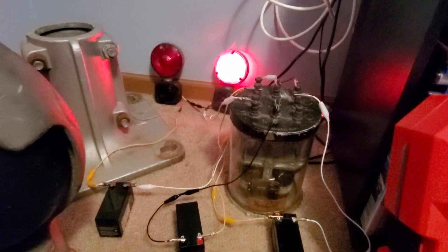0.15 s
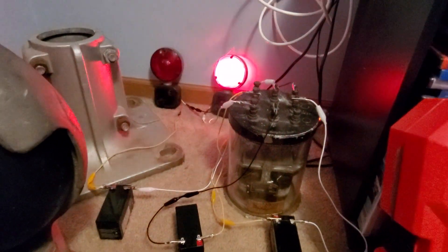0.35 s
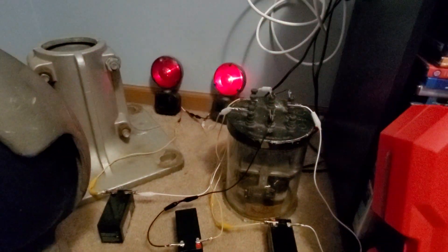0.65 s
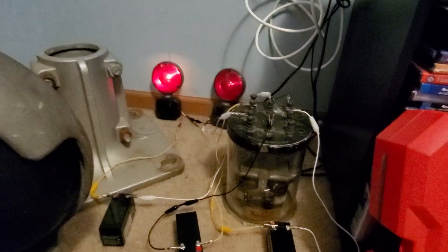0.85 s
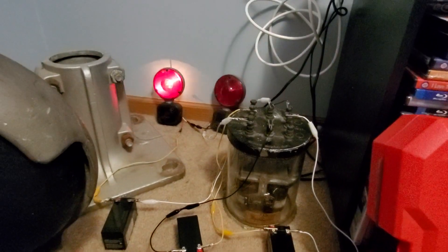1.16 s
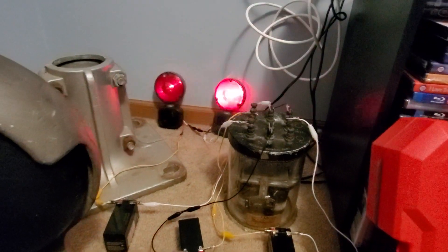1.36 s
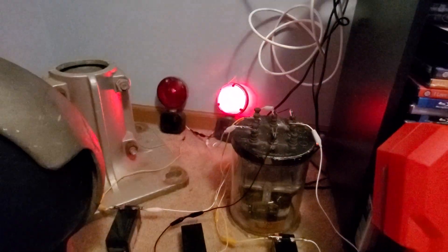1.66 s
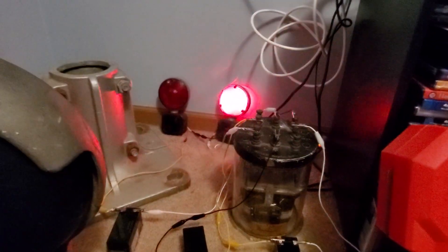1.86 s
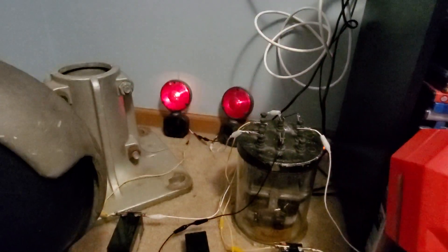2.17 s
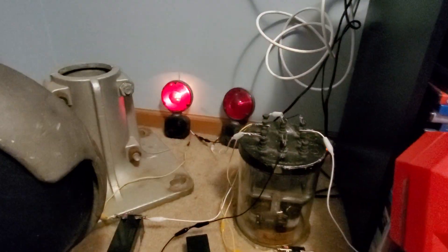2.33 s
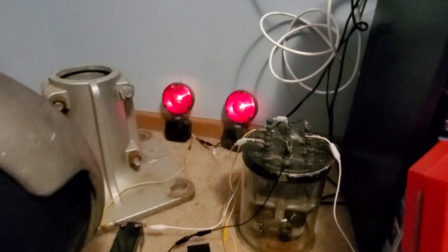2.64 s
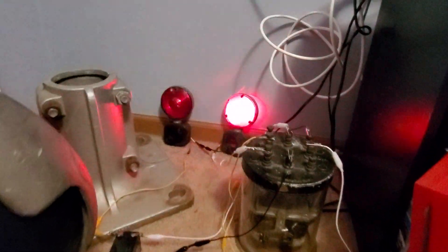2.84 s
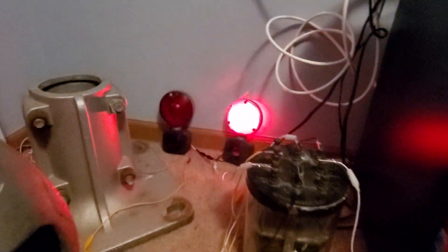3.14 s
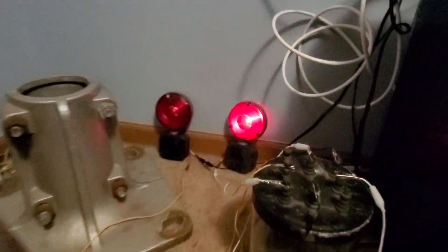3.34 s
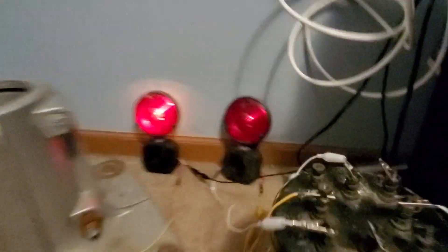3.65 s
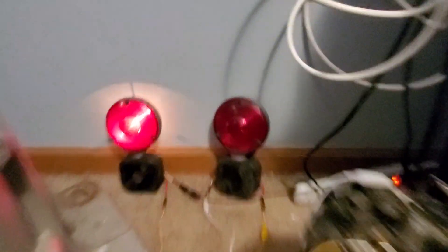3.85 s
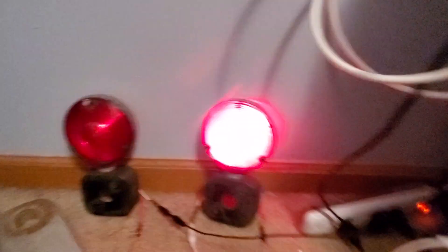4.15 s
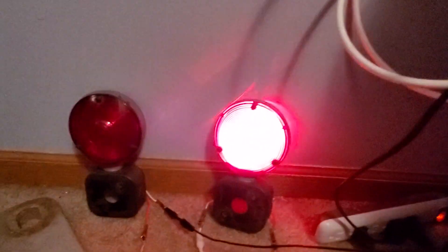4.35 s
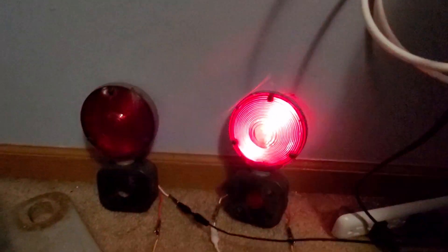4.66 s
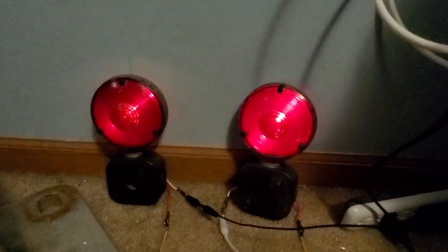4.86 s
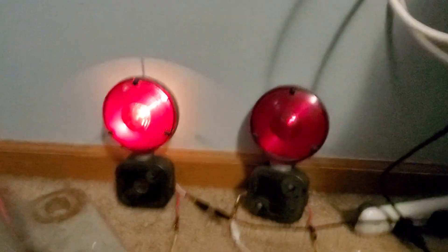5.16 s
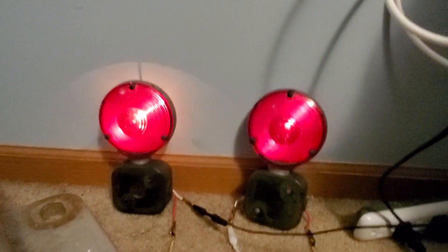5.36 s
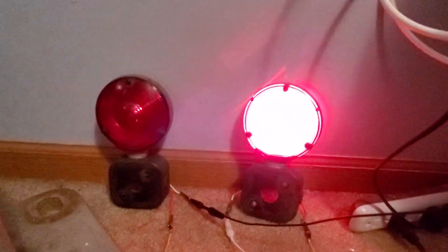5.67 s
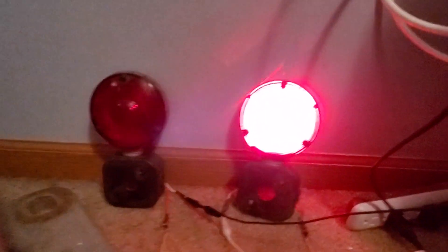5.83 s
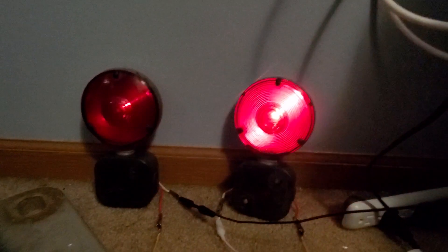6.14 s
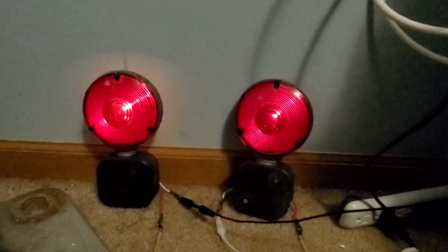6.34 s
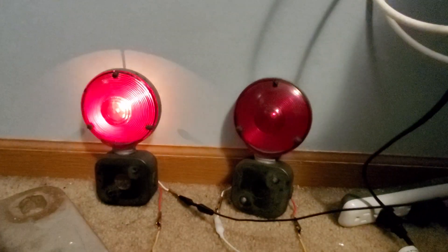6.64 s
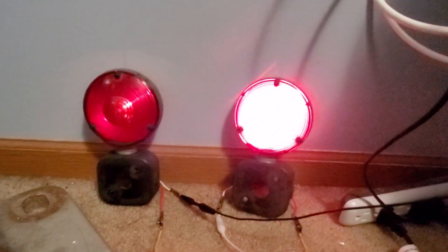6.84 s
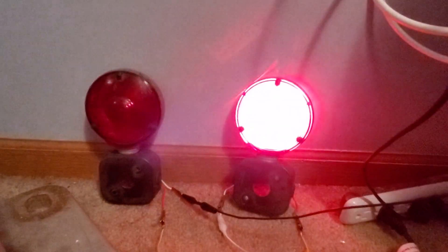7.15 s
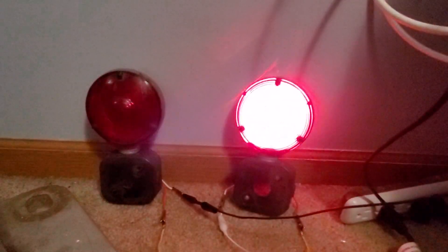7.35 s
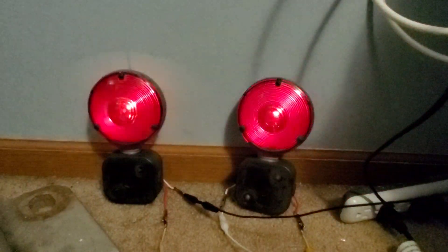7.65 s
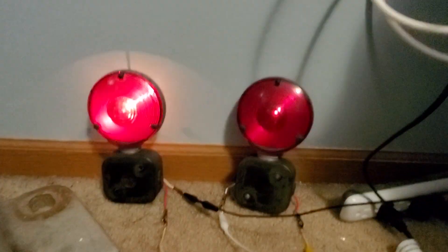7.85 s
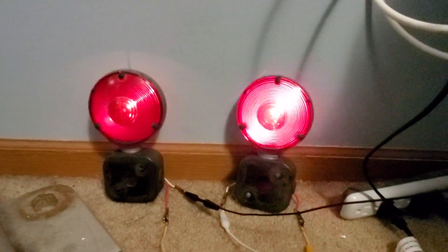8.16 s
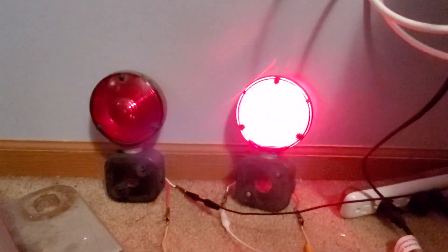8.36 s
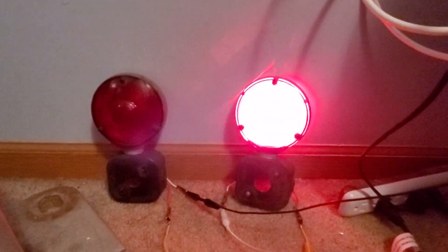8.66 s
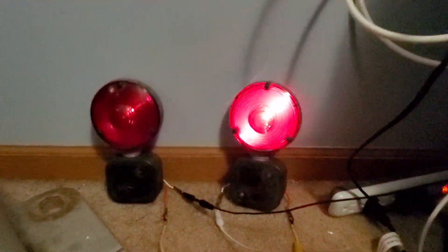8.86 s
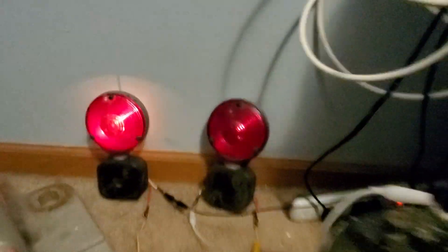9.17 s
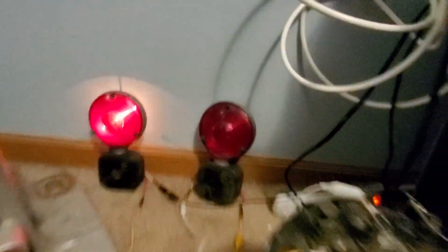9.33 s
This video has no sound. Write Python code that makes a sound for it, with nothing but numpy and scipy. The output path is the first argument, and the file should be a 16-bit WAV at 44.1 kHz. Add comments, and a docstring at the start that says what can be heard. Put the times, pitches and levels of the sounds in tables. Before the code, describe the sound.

An old relay clacks steadily to and fro in a small room, growing louder and drier as the hand-held microphone moves close, with cloth rustles and bumps.

```python
"""An old flasher relay in a glass case rocks to and fro on the carpet of a small room, switching two lamps.
Each armature throw is a resonant crack with one rebound, noise clatter shaped by the case, and room decay.
The hand-held microphone moves up close and draws back: throws change colour and turn drier.
Bumps on its housing are short noise bursts through resonances; sliding clothes are enveloped coloured noise.
Underneath lie a low noise rumble and a wavering sine hum."""
import sys
import numpy as np
from scipy import signal
from scipy.fft import rfft, irfft
from scipy.io import wavfile
from scipy.ndimage import uniform_filter1d

SR = 44100
rng = np.random.default_rng(int(sys.argv[2]) if len(sys.argv) > 2 else 0)


def inscribe(sig):
    """Save sig as 16-bit PCM at rate SR to the path in sys.argv[1].

    A 1-D sig is mono; a 2-D sig holds one channel per row.
    Samples are clipped to [-1, 1] before scaling.
    """
    pcm = np.round(np.clip(np.atleast_2d(sig).T, -1, 1) * 32767)
    wavfile.write(sys.argv[1], SR, pcm.astype(np.int16))


N = 418950
SIZE = 16384  # samples in one struck sound
T = np.arange(N) / SR
AGE = np.arange(SIZE) / SR
HZ = np.maximum(np.arange(SIZE // 2 + 1) * SR / SIZE, 1)
ALL_HZ = np.maximum(np.arange(N // 2 + 1) * SR / N, 1)


def relay(change=.5):
    """The armature rocks between two stops; each side repeats its own clatter with small changes."""
    # armature throws, sides 0 and 1 in turn: t/s, relative level/dB
    throws = [(.5153, -1.9), (1.2343, -1.5), (1.8835, -2.5), (2.6073, -1.6), (3.2608, -2.1), (3.9815, -2.5),
              (4.6338, 0.1), (5.354, -1.7), (6.0044, -1), (6.7228, -1.5), (7.373, -1.35), (8.0955, -1.5),
              (8.7446, 0.3), (9.466, -3.5)]
    # microphone path: t/s, closeness/0-1
    closeness = [(0, 0.15), (2.6, 0.11), (4.0, 0.4), (4.6, 0.89), (8.1, .95), (9.5, 0.63)]
    # colour of a throw: f/Hz, side 0/dB, side 1/dB, added up close/dB
    throw_colour = [(165, 3, 0.5, 5.5), (300, 1.5, 2.5, 3), (1296, -1, -2, 0), (2050, 0.5, -0.5, 0.5),
                    (6000, 0.02, -0.1, 1)]
    out = np.zeros((2, N))
    habit = rng.standard_normal((2, 3, 2, SIZE))
    tint = np.transpose(throw_colour)
    for k, (start_s, level_db) in enumerate(throws):
        side = k % 2
        near = np.clip(np.interp(start_s, *np.transpose(closeness)), 0, 1)
        chance = habit[side] + change * rng.standard_normal((3, 2, SIZE))
        colour_db = along(HZ, tint[0], tint[1 + side] + near * tint[3])
        sound = irfft(click(side, near, chance) * struck(undb(colour_db)))
        add(out, start_s, undb(level_db) * sound)
    return out


def click(side, near, chance, low_cut_hz=210, room_split_hz=2500, port_lag_s=14 / SR):
    """Spectrum of one throw at both ports: crack, rebound, clatter, room and springs."""
    # frame, contacts and glass case: f/Hz, width/Hz,
    # side 0 afar/dB, side 1 afar/dB, side 0 close/dB, side 1 close/dB
    case_modes = [(233, 22, 6, 8, 20, 30), (294, 32, 14, 24, 18, 14), (329, 22, 20, 15, 22, 27),
                  (356, 26, 23, 21, 18, 18), (420, 60, 7, 7, 17, 20), (483, 37, -1, 9, 18, 25),
                  (531, 31, 17, -1, 26, 14), (582, 40, 19, 19, 10, 24), (682, 18, 24, 19, 25, 23),
                  (832, 67, 18, 14, 13, 23), (930, 58, 23, 24, 27, 28), (1063, 54, 18, 16, 32, 31),
                  (1206, 74, 23, 10, 31, 19), (1331, 57, 20, 7, 33, 9), (1438, 74, 15, 11, 31, 24),
                  (1750, 103, 24, 21, 23, 23), (2036, 72, 10, 11, 18, 23), (2356, 159, 9, 18, 18, 22),
                  (2774, 172, 11, 5, 15, 16), (3631, 135, 11, 11, 15, 19), (4088, 149, 9, 6, 10, 11),
                  (4323, 287, 8, 2, 18, 4), (5074, 168, 3, -5, 4, 4), (5951, 208, 10, -5, 24, 18),
                  (6090, 118, 13, 15, 18, 21), (6534, 294, 6, 5, 14, 14), (7568, 393, 0, 3, 0, 12),
                  (8151, 406, 5, 2, 10, 12), (10531, 671, -2, -1, 2, 6), (12704, 868, -5, -11, 3, 3),
                  (14499, 716, -13, -5, -3, 4)]
    # first crack on the stop: f/Hz, width/Hz, side 0/dB, side 1/dB
    crack_modes = [(720, 900, 10, 14), (1260, 330, 30, 20), (2150, 900, 14, 15), (4350, 1300, 12, 5),
                   (6020, 750, 21, 14), (9100, 12000, -2, -5)]
    # microphone ports: f/Hz, left minus right afar/dB, close/dB, likeness afar/-1..1, close/-1..1
    port_table = [(235, -1, 0, .9, .5), (560, 2, -3.5, .8, .1), (1160, 2, -1, .35, -.65),
                  (2250, 5, .5, 0, .1), (4550, -4, -7, .2, .2), (11100, -3, -4.5, 0, 0)]
    # contact springs that ring on faintly: f/Hz, t60/s, relative level/dB
    spring_modes = [(682, .2, -56), (1310, .5, -66), (6090, .22, -55), (8125, .24, -55), (10400, .5, -71)]
    bounce_s, bounce_db = (0.013, 0.012)[side], -9.5  # re first crack

    def mix(far, close):
        """Value at the present closeness."""
        return far + near * (close - far)

    modes, stop, ports = np.transpose(case_modes), np.transpose(crack_modes), np.transpose(port_table)
    pan = sides(along(HZ, ports[0], mix(ports[1], ports[2])))
    likeness = along(HZ, ports[0], mix(ports[3], ports[4]))

    # the small case cannot radiate deep bass
    radiation = 1 / np.sqrt(1 + (low_cut_hz / HZ) ** 12)
    case = body(modes[0], modes[1], mix(modes[2 + side], modes[4 + side])) * radiation

    # contact chatter
    clatter_t60_s = mix(0.13, [.055, .06][side])
    clatter_rise_s = mix(0.0015, [.0003, .001][side])
    clatter_db = mix(-0.56, [-3, -.8][side])
    clatter = scatter(chance[0], clatter_t60_s, clatter_rise_s) * undb(clatter_db)

    # the room holds lows longer than treble
    dull = 1 / np.sqrt(1 + (HZ / room_split_hz) ** 4)
    room_lows = dull * scatter(chance[1], 0.24, 0.0071)
    room_highs = np.sqrt(1 - dull ** 2) * scatter(chance[2], 0.22, 0.012)
    room = undb(mix(-5.0, [-14, -11.5][side])) * (room_lows + room_highs)
    diffuse = pair(clatter + room, likeness) * struck(case * pan)

    # direct crack; up close it reaches the right port first
    lag_s = np.array([[port_lag_s * near], [0]])
    crack = struck(body(stop[0], stop[1], stop[2 + side], order=2) * radiation * pan)
    crack = crack * np.exp(-2j * np.pi * HZ * lag_s)
    crack = crack * (1 + undb(bounce_db) * np.exp(-2j * np.pi * HZ * bounce_s))

    springs = np.zeros((2, SIZE))
    for f_hz, t60_s, level_db in spring_modes:
        phase = rng.random((2, 1))
        springs += undb(level_db - 60 * AGE / t60_s) * np.sin(2 * np.pi * (f_hz * AGE + phase))
    return diffuse + undb(mix(-14, -0.66)) * crack + undb(mix(1.5, 0)) * rfft(springs)


def handling():
    """Fingers bump the housing: dry ticks and knocks reach the ports through its resonances."""
    # bumps: t/s, thud/dB, knock/dB, tick/dB, t60/s, left minus right/dB
    bumps = [(3.096, 1, -8, -27, 0.015, -11), (3.4123, -15, -6.5, 15, 0.0012, -27),
             (3.6261, 2, -6, -19, 0.17, -3), (3.6445, 7.5, 0, -7, 0.039, -6),
             (3.6898, -12, -20, -39, 0.049, -6), (4.3027, -14, -14.5, -32, .03, 2),
             (5.4748, -34.5, -35, -23, .01, -14), (6.2045, -5.5, -31, -52, 0.029, -12),
             (7.7658, -37.5, -29, -41, 0.0076, -18), (8.8478, 14, 2, -16, 0.0043, -10),
             (8.8645, -15, -12.5, -24, 0.0042, -11)]
    # housing resonances, a thud, two knocks and a tick: f/Hz, width/Hz
    housing_modes = [(170, 240), (650, 2100), (1650, 860), (13900, 2900)]
    out = np.zeros((2, N))
    for start_s, thud_db, knock_db, tick_db, t60_s, pan_db in bumps:
        contact = pair(scatter(rng.standard_normal((2, SIZE)), t60_s, 0.00013), 0.297)
        levels_db = [thud_db, knock_db, knock_db, tick_db]
        housing = body(*np.transpose(housing_modes), levels_db, order=1.7)
        add(out, start_s, sides(pan_db) * irfft(contact * struck(housing)))
    return out


def clothes():
    """Cloth slides as the arm moves: fine hiss, coarser brushing with catching folds, short scuffs."""
    # arm movements: start/s, length/s, relative fine hiss/dB, relative coarse brushing/dB
    moves = [(0, 0.41, -72.5, -66), (.9, 0.15, -71, -73), (1.17, .3, -64.5, -63), (1.73, 0.37, -76.5, -68),
             (2.92, 0.11, -67.5, -70), (3.13, 0.36, -69.5, -62), (4.0, 1.6, -58, -59.5),
             (5.45, .2, -75.5, -76.5), (8.88, .42, -62, -66.5), (9.38, .12, -90.5, -62.5)]
    # short scuffs: t/s, level/dB, length/s, centre f/Hz, width/Hz
    scuffs = [(0.338, -50.5, 0.029, 1630, 970), (0.887, -65, 0.039, 1500, 4320),
              (4.155, -54.5, 0.014, 1700, 1200), (4.301, -54.5, 0.037, 910, 1780),
              (5.239, -53, 0.04, 1710, 900)]
    hiss_sag_db_per_s, brush_sag_db_per_s = 8, 13.5
    catches_per_s, catch_db, catch_spread_db = 43, -9, 5.5  # catch level re brushing

    fine = sum(undb(db) * stroke(s, length, hiss_sag_db_per_s) for s, length, db, _ in moves)
    coarse = sum(undb(db) * stroke(s, length, brush_sag_db_per_s) for s, length, _, db in moves)
    hiss_db = along(ALL_HZ, [2090, 4530, 8900, 12200, 15800], [-31.5, -6.5, -8.0, -2.0, -6.0])
    hiss = noise(undb(hiss_db), 0.096)
    weave_db = along(ALL_HZ, [160, 460, 920, 2100, 4400, 8100], [-6.5, 6.5, -2.5, -0.1, -8.0, -15.0])
    weave = undb(weave_db)

    # folds catch and let go at random instants, common to both ports
    instants = rng.random(N) < catches_per_s / SR
    catches = instants * undb(catch_spread_db * rng.standard_normal((2, N)))
    catches = irfft(rfft(catches) * weave, N)
    brush = noise(weave, 0.75) + undb(catch_db) * catches / catches.std()
    out = shimmer(hiss * fine + brush * coarse, depth_db=4, rate_hz=14) * undb(1.0 * walk(25))

    for start_s, level_db, length_s, centre_hz, width_hz in scuffs:
        grain = pair(rfft(rng.standard_normal((2, SIZE))), 0.14)
        rub = irfft(grain * resonance(HZ, centre_hz, width_hz) ** 2)
        envelope = np.exp(-(AGE / length_s) ** 4)
        add(out, start_s, undb(level_db) * rub / rub.std() * envelope)
    return out


def stroke(start_s, length_s, sag_db_per_s, attack_s=0.059, release_s=0.055):
    """Envelope of one arm movement: swell, slow sag as the arm eases off, release."""
    early_s = np.maximum(start_s - T, 0)
    late_s = np.maximum(T - start_s - length_s, 0)
    sag_db = -sag_db_per_s * np.clip(T - start_s, 0, length_s)
    return np.exp(-(early_s / attack_s) ** 2 - late_s / release_s) * undb(sag_db)


def shimmer(x, depth_db, rate_hz, count=8):
    """The colour of a rustle shifts: each octave band flickers on its own."""
    octave = np.clip(np.log2(ALL_HZ / 125), 0, count - 1)
    spectrum = rfft(x)
    out = np.zeros((2, N))
    for k in range(count):
        band = irfft(spectrum * np.maximum(1 - abs(octave - k), 0), N)
        out += band * undb(depth_db * walk(rate_hz))
    return out


def room_tone(rumble_db=-54.0, hum_hz=185.6, hum_db=-62):
    """Low house rumble builds up and a wavering appliance hum fades as the microphone nears the wall."""
    # rumble spectrum: f/Hz, relative density/dB per Hz
    rumble_spectrum = [(21, -19.5), (41, -15), (58, -0.5), (76, -9.5), (96, -7.5), (126, -19.5), (162, -24),
                       (282, -28.5), (455, -36.5), (1010, -44), (2050, -46.5), (5050, -55.5), (8500, -64),
                       (12500, -55.5)]
    to_wall_s = (3.1, 3.6)
    hum_change_db, rumble_change_db = -10.5, 2  # at the wall
    wall = np.interp(T, to_wall_s, [0, 1])
    likeness = along(ALL_HZ, [150, 500, 1500], [.88, .6, .1])
    rumble = noise(undb(along(ALL_HZ, *np.transpose(rumble_spectrum))), likeness)
    hum_level_db = hum_db + hum_change_db * wall + 2.0 * walk(6.3)
    # sqrt(2): level counts as rms
    hum = np.sin(2 * np.pi * hum_hz * T + 0.28 * walk(5)) * np.sqrt(2) * undb(hum_level_db)
    return rumble * undb(rumble_db + rumble_change_db * wall + 0.18 * walk(2)) + hum


def undb(db):
    """Decibels to gain."""
    return 10 ** (np.asarray(db) / 20)


def along(hz, points, values):
    """Values joined by straight lines on a log-frequency axis."""
    return np.interp(np.log(hz), np.log(points), values)


def sides(pan_db):
    """Left and right gains of constant total power."""
    g = undb(np.array([[1], [-1]]) * pan_db / 2)
    return g / np.sqrt(np.mean(g ** 2, axis=0))


def resonance(hz, centre_hz, width_hz):
    """Gain of one resonance, 1 at its centre."""
    return 1 / np.sqrt(1 + ((hz ** 2 - centre_hz ** 2) / (hz * width_hz)) ** 2)


def body(centres_hz, widths_hz, levels_db, order=1):
    """Gain of a set of resonances summed in power; a higher order steepens their skirts."""
    power = 0
    for f_hz, width_hz, db in zip(centres_hz, widths_hz, levels_db):
        power = power + (undb(db) * resonance(HZ, f_hz, width_hz) ** order) ** 2
    return np.sqrt(power)


def struck(gain):
    """Minimum-phase response with this gain: sharp start, ringing after."""
    cepstrum = irfft(np.log(gain + 1e-7))
    # fold onto positive time
    cepstrum[..., 1:SIZE // 2] *= 2
    cepstrum[..., SIZE // 2 + 1:] = 0
    return np.exp(rfft(cepstrum))


def scatter(grains, t60_s, rise_s, count=3):
    """Spectrum of dense, nearly colourless impacts or echoes that swell and die away; unit energy."""
    fade = undb(-60 * AGE / t60_s) * (1 - np.exp(-(AGE + 1 / SR) / rise_s))
    x = grains * fade
    # alternately flatten the spectrum and restore the envelope
    for _ in range(count):
        spectrum = rfft(x)
        x = irfft(spectrum / (abs(spectrum) + 1e-12))
        local_power = abs(uniform_filter1d(x ** 2, size=120))
        x = x * fade / np.sqrt(local_power + 1e-14)
    return rfft(x / np.sqrt(np.sum(x ** 2, axis=-1, keepdims=True)))


def pair(two, likeness):
    """Two unrelated spectra become left and right with the given likeness (correlation)."""
    c = np.clip(likeness, -.98, .98)
    common = two[0] * np.sqrt((1 + c) / 2)
    opposed = two[1] * np.sqrt((1 - c) / 2)
    return common + np.array([[1], [-1]]) * opposed


def noise(gain, likeness):
    """Stereo noise of a given colour, rms 1."""
    x = irfft(pair(rfft(rng.standard_normal((2, N))), likeness) * gain, N)
    return x / x.std()


def walk(rate_hz):
    """Random level: straight lines between normal draws of spread 1."""
    knots = rng.standard_normal(int(N / SR * rate_hz) + 2)
    return np.interp(T * rate_hz, np.arange(len(knots)), knots)


def add(out, start_s, sound):
    """Mix a sound in at its start time, fading its second half."""
    i = int(start_s * SR)
    fade = np.minimum(2 - 2 * AGE / AGE[-1], 1) ** 2
    out[:, i:i + SIZE] += (sound * fade)[:, :N - i]


def scene():
    """Relay, hand, clothes and room."""
    return relay() + handling() + clothes() + room_tone()


def record(dry, top_hz=15900):
    """The recorder clips at full scale, then cuts the top."""
    low_pass = signal.ellip(8, .2, 70, top_hz, fs=SR, output="sos")
    return signal.sosfilt(low_pass, np.clip(dry, -1, 1))


dry = scene()
out = record(dry)
inscribe(out)
```